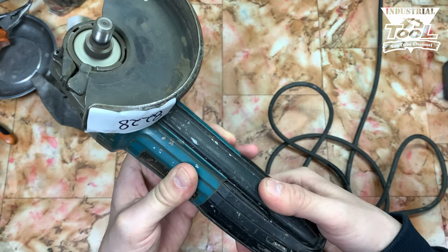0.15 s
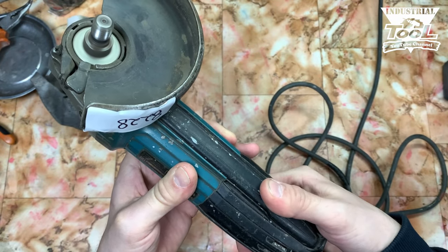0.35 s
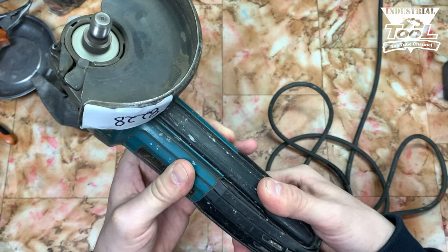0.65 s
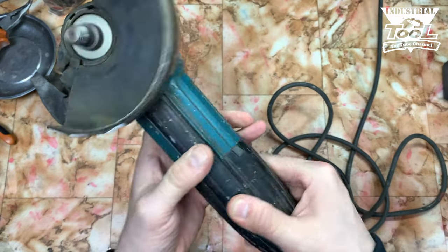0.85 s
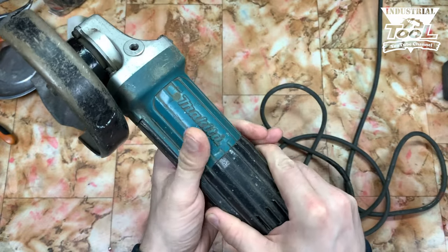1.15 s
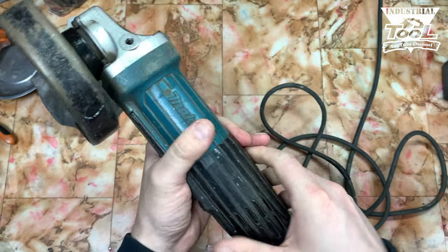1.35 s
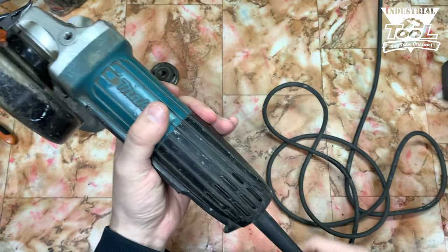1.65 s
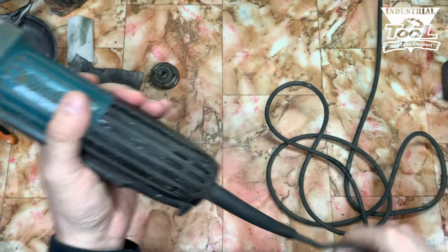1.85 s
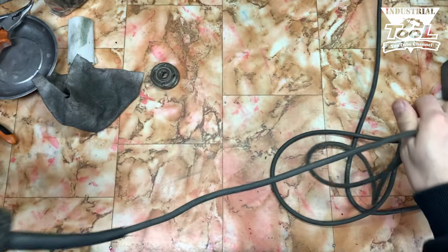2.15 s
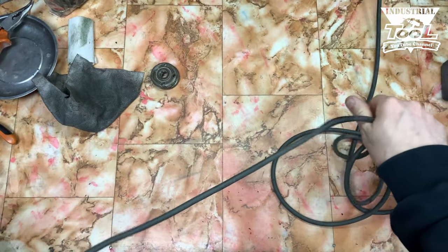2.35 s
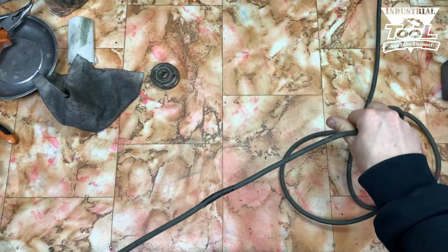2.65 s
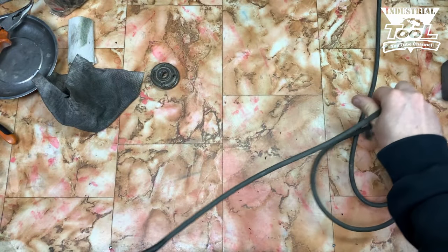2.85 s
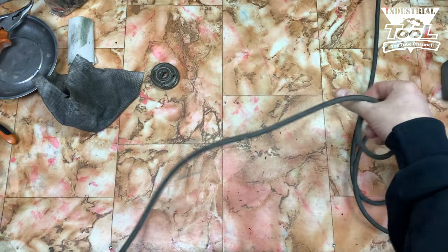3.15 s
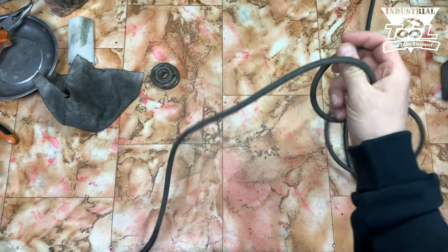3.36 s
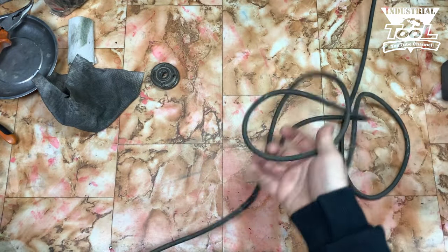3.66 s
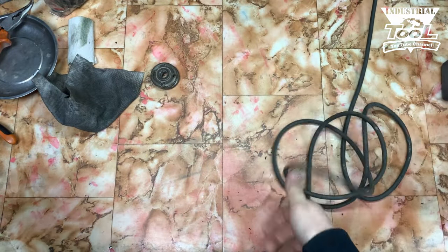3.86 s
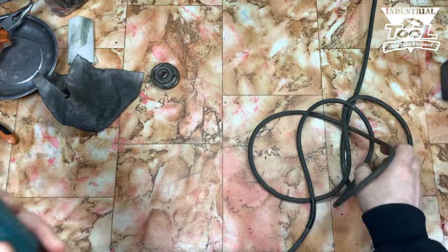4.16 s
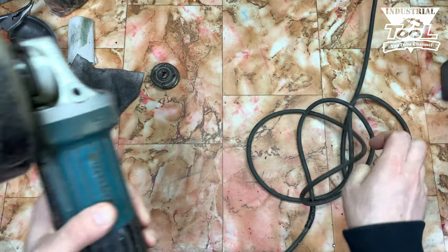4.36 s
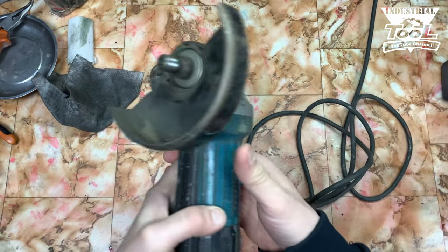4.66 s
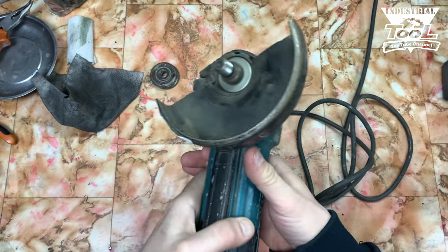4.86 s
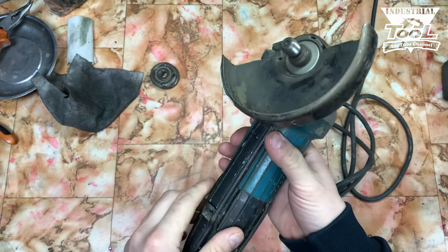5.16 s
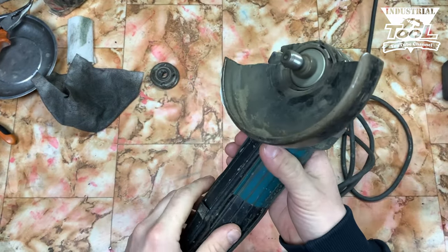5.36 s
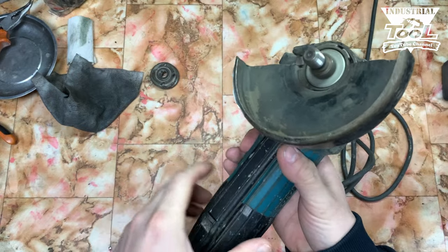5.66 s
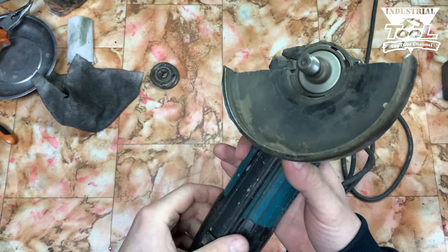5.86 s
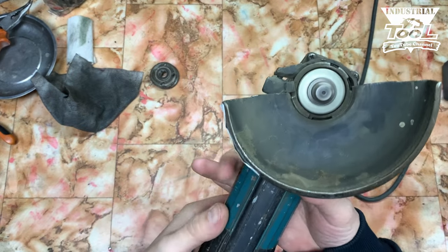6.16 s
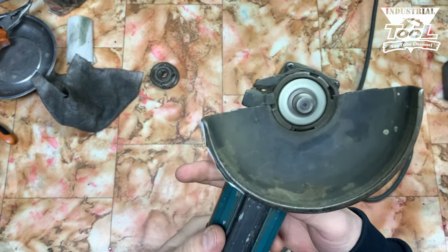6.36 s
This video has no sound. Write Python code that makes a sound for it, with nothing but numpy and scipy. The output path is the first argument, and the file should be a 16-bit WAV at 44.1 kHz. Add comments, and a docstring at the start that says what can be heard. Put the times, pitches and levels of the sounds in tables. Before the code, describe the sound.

A discless angle grinder whirs with bright, airy hiss close by, dips as it swings aside, then is switched off and spins down with gears rattling.

```python
"""A room with a tiled floor: an angle grinder without a disc runs free in the hand, close to a two-port microphone.
Shaped noise makes fan air and brush hiss over a faint shaft tone; short rings make the gear knocks.
The tool is swung aside and back while its cord lands on the tiles in dull thumps, then switched off.
As it coasts a thin whine falls with the speed, and the unloaded bevel gears start to rattle.
Behind it lie a diffuse wash from walls and floor, a low drone and the room tone."""
import sys
import numpy as np
from scipy import signal
from scipy.fft import rfft, irfft, next_fast_len
from scipy.io import wavfile
from scipy.ndimage import uniform_filter1d, map_coordinates

SR = 44100
rng = np.random.default_rng(int(sys.argv[2]) if len(sys.argv) > 2 else 0)


def transcribe(u):
    """Save the signal u as a 16-bit wav file named by the first command-line argument.

    u: samples, shape (n,) or (channels, n), limited to [-1, 1]; the rate is SR.
    q: integer samples, one column per channel.
    """
    v = np.clip(np.atleast_2d(u).T, -1, 1)
    q = np.round(v * 32767).astype(np.int16)
    wavfile.write(sys.argv[1], SR, q)


N = 287091
T = np.arange(N) / SR

# the rush as the tool is moved about and slows: t/s, fan air level/dB, brush hiss level/dB, before the trims
RUSH = [(0.02, -37.5, -36), (0.72, -38, -34), (0.94, -36.5, -33.5), (1.96, -38.5, -35), (2.1, -40.5, -36),
        (2.42, -43.5, -40.5), (2.88, -49, -45), (3.46, -43, -40.5), (3.85, -38.5, -32.5), (4.1, -39, -31),
        (4.36, -37, -32.5), (4.72, -41.5, -40.5), (5.04, -43, -43.5), (5.22, -45.5, -44), (6.03, -47, -47),
        (6.08, -48.5, -44.5), (6.21, -48, -49.5), (6.48, -50.5, -48)]
AIR_TRIM_DB, HISS_TRIM_DB = 2.5, 3.0
# which way the tool faces the microphone: t/s, pose
# (pose 0 held close, 1 swung aside, 2 brought back, 3 coasting, 4 crawling)
POSE = [(0, 0), (1.95, 0), (2.45, 1), (3.4, 1), (3.9, 2), (4.3, 2), (4.6, 2.5), (5.3, 3), (5.55, 3),
        (6.15, 4)]
# colour of the rush in each pose: f/Hz, relative level/dB
CLOSE = [(100, -28.5), (190, -25.5), (260, -14), (340, -19.5), (460, -12), (700, -15), (1100, -4.5),
         (2500, -2.5), (3700, -3.5), (4800, 3), (6000, 0.5), (7000, -3), (8100, -0.5), (9800, -5.5),
         (13000, -8), (15300, -13.5)]
ASIDE = [(100, -29), (190, -32), (260, -14.5), (480, -12.5), (720, -9.5), (1000, -2.5), (1300, -7.5),
         (2700, 1.5), (3400, -0.5), (5000, 2), (6000, 1), (7100, -5.5), (8800, 1.5), (11000, -7.5),
         (13500, -11), (15300, -12)]
BACK = [(100, -28), (190, -24), (270, -17), (450, -12.5), (700, -14.5), (1300, -5), (2100, -3.5), (2900, 1),
        (3600, -1), (5000, 1.5), (5900, 7.5), (7000, -4.5), (8400, 1), (10800, -3.5), (13200, -5.5),
        (15300, -6.5)]
COASTING = [(100, -31), (190, -20.5), (270, -14), (750, -8), (930, -2), (1040, -7), (1170, -0.5),
            (1800, -1.5), (3000, -2.5), (3700, 0), (5100, -1.5), (6500, 1), (8300, 3), (10800, -2.5),
            (13000, -7.5)]
CRAWLING = [(100, -30), (190, -16.5), (400, -8), (620, -7), (780, -1.5), (1030, -15.5), (1250, -8),
            (1750, -1.5), (2800, -2), (3700, -1.5), (5100, -5), (6500, -2), (8300, -3), (10500, -3),
            (12500, -8.5)]
# likeness of the two ports, facing the tool: f/Hz, likeness (1 = identical)
ALIKE = [(100, .98), (500, .87), (1200, .88), (2200, .68), (3700, .62), (4500, .85), (4850, .995),
         (5500, .995), (6500, .8), (8300, .99), (10300, .78), (11500, .99), (13200, .99), (14300, .75),
         (15300, .95)]
# the same with the tool swung aside, heard mostly by reflection: f/Hz, likeness (1 = identical)
ASIDE_ALIKE = [(100, .98), (500, .85), (1000, .6), (2200, .35), (4600, .35), (5600, .7), (7000, .75),
               (8300, .98), (10300, .75), (12300, .98), (15000, .8)]
# gain on the finest brush fizz with and without current, and the time its fade takes
FIZZ_ON_DB, FIZZ_OFF_DB, FIZZ_FADE_S = 2.5, -3, 1
# the rush comes back off the tiles: delay, its drift as the tool moves, share
FLOOR_S, FLOOR_DRIFT_S, FLOOR_SHARE = 0.0064, 0.00022, 0.2
YIELD_DB = -3.5  # the rush gives way to fully slack gears


def rush(speed):
    """Fan air below, brush hiss above; their colour follows the pose and the brushes sputter."""
    air_db, hiss_db = curves(RUSH)
    pose, = curves(POSE)
    pair = noise(patchy_db=2.5)
    pair = pair + FLOOR_SHARE * delayed(pair, FLOOR_S + FLOOR_DRIFT_S * wobble(1.5))
    direct, reflected = blended(pair, ALIKE), blended(pair, ASIDE_ALIKE)
    below = lambda hz, edge_hz: 1 / (1 + (hz / edge_hz) ** 10)
    poses = [(CLOSE, direct), (ASIDE, reflected), (BACK, direct), (COASTING, direct), (CRAWLING, direct)]
    air, hiss = np.zeros((2, 2, N))
    for k, (colour, source) in enumerate(poses):
        share = np.clip(1 - abs(pose - k), 0, 1)
        housing = ripple(depth_db=0.8, spacing_hz=45)
        coloured = filtered(source, lambda hz: amp(along(colour, hz)) * housing(hz))
        low = filtered(coloured, lambda hz: below(hz, 5100))
        air += share * unit(low)
        hiss += share * unit(coloured - low)
    # the top of the hiss loses strength with the current
    fizz_db = np.interp(T, [OFF_S, OFF_S + FIZZ_FADE_S], [FIZZ_ON_DB, FIZZ_OFF_DB])
    fizz = filtered(hiss, lambda hz: 1 - below(hz, 11300))
    hiss = hiss + (amp(fizz_db + 1.5 * wobble(70)) - 1) * fizz
    sputter = amp(0.5 * wobble(45) + 0.9 * wobble(400))
    fan_air = amp(air_db + AIR_TRIM_DB) * air
    brush_hiss = amp(hiss_db + HISS_TRIM_DB) * hiss * sputter
    return amp(YIELD_DB * slack(speed)) * (fan_air + brush_hiss)


# full running speed (turns per second) and the moment of switching off
FULL_SPEED, OFF_S = 590, 4.415
# bearing friction (turns per second lost each second), speed at which fan drag equals it (turns per second)
FRICTION, DRAG_SPEED = 108, 450
# an early sag: lowest moment, depth (turns per second), time constant either side
SAG_S, SAG_DEPTH, RECOVER_S = 0.09, 65, 0.44


def rotor_speed():
    """Turns per second: a sag and recovery, then a coast against friction and drag with speed squared."""
    running = FULL_SPEED - SAG_DEPTH * np.exp(-abs(T - SAG_S) / RECOVER_S)
    coasted_s = np.maximum(T - OFF_S, 0)
    return DRAG_SPEED * np.tan(np.arctan(running / DRAG_SPEED) - FRICTION / DRAG_SPEED * coasted_s)


# housing resonances that the whine sweeps through: f/Hz, width/Hz, lift/dB
WHINE_PEAKS = [(14830, 480, 8.5), (12000, 900, 0), (7860, 550, 8.5)]
# level at full speed and loss as the speed halves, both before the resonances and echoes
WHINE_DB, WHINE_DB_PER_OCTAVE = -42.5, 11
ECHO_S, ECHO_SHARE = 0.002646, 0.55  # back off the hands and guard
SCATTER_DB, SCATTER_T60_S = -7, 0.07  # back off nearby things, relative to the direct whine


def whine(speed, turns):
    """The commutator whines far above the hum; as it glides it beats against its own echoes and breaks up."""
    bars = 31
    whine_db = WHINE_DB + WHINE_DB_PER_OCTAVE * np.log2(speed / FULL_SPEED)
    whine_db = whine_db + flare(bars * speed, WHINE_PEAKS)
    phase = 2 * np.pi * bars * turns + 0.4 * wobble(60) + 0.22 * wobble(400)
    direct = np.sqrt(2) * amp(whine_db + 2.3 * wobble(40)) * np.sin(phase)
    t = np.arange(SR // 16) / SR
    tail = rng.standard_normal((2, len(t))) * amp(-60 * t / SCATTER_T60_S)
    scattered = signal.fftconvolve(direct[None], tail / np.linalg.norm(tail[0]), axes=1)[:, :N]
    return direct + ECHO_SHARE * delayed([direct], ECHO_S) + amp(SCATTER_DB) * scattered


# separate gear tooth knocks: t/s, peak level/dB before the trim
KNOCKS = [(.8902, -25), (.8942, -25), (.9004, -22), (.9262, -21), (.9328, -23), (5.5554, -29),
          (5.6141, -28), (5.6346, -29), (5.659, -28), (5.8182, -30), (5.8224, -28), (5.882, -28),
          (5.9044, -34), (5.9334, -30), (5.9853, -28), (6.0284, -29), (6.0514, -27), (6.0584, -29),
          (6.067, -33), (6.0824, -36), (6.0964, -30), (6.1184, -30), (6.1434, -31), (6.1804, -28),
          (6.185, -29), (6.2095, -25.5), (6.2135, -30), (6.241, -31), (6.2478, -27), (6.2508, -24),
          (6.255, -30), (6.2625, -31), (6.2748, -30), (6.279, -31), (6.2818, -30), (6.291, -31),
          (6.3078, -22.5), (6.3122, -30), (6.3302, -25), (6.34, -31), (6.3655, -24), (6.3704, -29),
          (6.3905, -33), (6.3965, -30), (6.4, -26), (6.4245, -30), (6.4275, -31), (6.443, -25.5),
          (6.4515, -23.5), (6.4622, -26.5), (6.472, -32), (6.4817, -27), (6.4955, -31)]
KNOCK_TRIM_DB = -1.5
# spells of harder chatter: t/s of the middle, length/s, level/dB
RATTLES = [(0.898, 0.28, -40), (6.084, 0.17, -47)]
# light chatter relative to the untrimmed hiss; chatter added once the gears are fully slack
LIGHT_CHATTER_DB, SLACK_CHATTER_DB = -18.5, -47


def gears(speed, turns):
    """Teeth bounce in their backlash: uneven chatter about once a turn, and hard, separate knocks."""
    _, hiss_db = curves(RUSH)
    strength = amp(hiss_db + LIGHT_CHATTER_DB) + amp(SLACK_CHATTER_DB) * slack(speed)
    strength = strength + sum(amp(db) * swell(T, s, length) for s, length, db in RATTLES)
    at = np.flatnonzero(np.diff(np.floor(turns)))
    late, size = rng.standard_normal((2, len(at)))
    at = np.clip(at + (late * 0.0007 * SR).astype(int), 0, N - 1)
    # each group of teeth rings in its own way
    groups = np.arange(len(at)) % 6
    chatter = np.zeros(N)
    for k in np.unique(groups):
        hits = np.bincount(at, amp(5.5 * size) * (groups == k), N)
        chatter += signal.fftconvolve(hits, tooth())[:N]
    knocks = np.zeros(N + SR)
    for s, db in KNOCKS:
        knock = tooth()
        knocks[round(s * SR):][:len(knock)] += amp(db + KNOCK_TRIM_DB) * knock
    return strength * unit(chatter) + knocks[:N]


# modes of the gear head and guard: f/Hz before detuning, relative level/dB before scatter, t60/s
HEAD = [(1200, -22, 0.045), (1700, -5, 0.009), (2240, -7, 0.007), (3730, -5.5, 0.017), (6300, -7, 0.0039),
        (7970, 2.5, 0.0054), (8340, 1.5, 0.0051), (9010, -4, 0.015), (10740, 4, 0.015)]
TOOTH_SCATTER_DB, TOOTH_DETUNE = 3, 0.012  # spread of mode levels, and of mode pitches as a share


def tooth():
    """One knock of the gears, never twice alike: a short crack and the ring of the head, with peak 1."""
    t = np.arange(SR // 25) / SR
    hz, db, t60 = np.transpose(HEAD)[:, :, None]
    size, phase, detune = rng.standard_normal((3, len(HEAD), 1))
    hz = hz * (1 + TOOTH_DETUNE * detune)
    decay = amp(db + TOOTH_SCATTER_DB * size - 60 * t / t60)
    ring = (decay * np.sin(2 * np.pi * (hz * t + phase))).sum(0)
    crack = 1.2 * amp(-60 * t / 0.0033) * rng.standard_normal(len(t))
    knock = (ring + crack) * (1 - np.exp(-t / 0.00038))
    # the small metal head radiates neither bass nor the very top
    head_band = signal.butter(4, [800, 11500], "bandpass", fs=SR, output="sos")
    knock = signal.sosfilt(head_band, knock)
    return knock / abs(knock).max()


SLACK_FROM, SLACK_FULL = 490, 253  # speeds between which the gears go slack (turns per second)


def slack(speed):
    """How loosely the gears mesh, from 0 at speed to 1 at a crawl."""
    return np.clip((SLACK_FROM - speed) / (SLACK_FROM - SLACK_FULL), 0, 1)


# once-a-turn hum, changing with grip and speed: t/s, level/dB before its wobble
HUM = [(0, -58), (.28, -57), (.4, -70), (.75, -75), (1.05, -64), (1.4, -62), (1.8, -68), (2.05, -63),
       (2.5, -73), (3.35, -75), (3.52, -62), (3.78, -67), (3.92, -58.5), (4.44, -58), (4.57, -67),
       (4.66, -58.5), (4.85, -63), (5.08, -59), (5.4, -68.5), (5.8, -73.5), (6.1, -65), (6.5, -74)]
# rotor overtones from fan and bearings: multiple of the speed, level/dB relative to the untrimmed fan air
OVERTONES = [(4, -22), (5, -19), (6, -20)]
# resonances of the gear head that they sweep through: f/Hz, width/Hz, lift/dB
OVERTONE_PEAKS = [(2950, 200, 3), (2450, 120, 10), (2200, 160, 8), (1830, 130, 11)]


def rotor(speed, turns):
    """Unbalance hums unsteadily once a turn; rough overtones sing out as they pass resonances of the head."""
    hum_db, = curves(HUM)
    air_db, _ = curves(RUSH)
    hum_phase = 2 * np.pi * turns + 0.35 * wobble(25) + 0.2 * wobble(120)
    out = np.sqrt(2) * amp(hum_db + 2.3 * wobble(14)) * np.sin(hum_phase)
    for k, db in OVERTONES:
        tone = unit(amp(2 * wobble(30)) * np.sin(2 * np.pi * k * turns + 0.6 * wobble(45)))
        out = out + amp(air_db + db + flare(k * speed, OVERTONE_PEAKS)) * tone
    return out


# narrow resonances of air path and gear head, heard as the tool turns:
# start t/s, end t/s, f/Hz, width/Hz before narrowing, level/dB
VENTS = [(1.55, 1.95, 1120, 240, -55), (1.15, 1.85, 2530, 220, -46.5), (3.53, 4.1, 2850, 400, -45),
         (5.25, 5.7, 1160, 120, -57), (6.0, 6.5, 3720, 110, -56), (6.05, 6.5, 1720, 220, -56),
         (2.21, 2.4, 910, 50, -56), (2.43, 3.35, 1010, 45, -59), (2.5, 3.3, 930, 40, -63),
         (3.35, 3.68, 930, 55, -55), (2.1, 2.5, 2060, 70, -54), (3.0, 3.45, 3545, 50, -54),
         (3, 3.24, 1590, 40, -58), (2.9, 3.6, 2630, 110, -53)]
VENT_DRIFT_S = 0.001407  # the path from the vents lengthens and shortens, bending their pitch


def vents():
    """Resonances of the air path and head swell, bend and fade as the tool turns."""
    source, out = blended(noise(patchy_db=0.5), ALIKE), np.zeros((2, N))
    for start, end, hz, width_hz, db in VENTS:
        facing = np.clip(np.minimum(T - start, end - T) / 0.11 + 0.5, 0, 1)
        out += amp(db) * facing * band(source, hz, 0.8 * width_hz)
    return delayed(out, VENT_DRIFT_S * wobble(4))


# the cord meets the floor, a hand meets the housing: t/s, f/Hz, level/dB before the attack softens it
THUMPS = [(3.352, 130, -51), (3.452, 110, -50), (3.66, 85, -54), (3.7, 120, -49), (3.78, 94.5, -53),
          (3.94, 120, -54), (3.766, 345, -38.5), (4.945, 245, -41.5), (4.959, 185, -45)]
THUMP_ATTACK_S, THUMP_T60_S = 0.0024, 0.037
# soft rubs of the hands: t/s of the middle, length/s, f/Hz, level/dB
RUBS = [(4.925, 0.037, 115, -65.5), (4.972, .07, 238, -57), (4.997, 0.05, 160, -62)]
RUB_WIDTH = 0.25  # bandwidth of a rub, as a share of its pitch


def handling():
    """The cord drops on the tiles in short, dull thumps; the grip shifts with a bump and brief rubs."""
    source, out = rng.standard_normal(N), np.zeros(N)
    for s, length, hz, db in RUBS:
        out += amp(db) * swell(T, s, length) * band(source, hz, RUB_WIDTH * hz)
    t = np.arange(SR // 8) / SR
    for s, hz, db in THUMPS:
        envelope = amp(db - 60 * t / THUMP_T60_S) * (1 - np.exp(-t / THUMP_ATTACK_S))
        out[round(s * SR):][:len(t)] += envelope * np.sin(2 * np.pi * hz * t)
    return out


# phase by which the left port leads: f/Hz, lead/rad
LEAD = [(30, 0), (450, -.15), (700, -.8), (1030, .8), (1400, .15), (1950, .25), (2500, 1.8), (3900, 1.4),
        (4550, 2.2), (4850, 3.02), (5500, 3.27), (5900, 3.95), (7800, 6.2), (9400, 6.45), (11200, 9.25),
        (13500, 9.6), (14600, 12), (15800, 12.5)]
# level of the left port over the right: f/Hz, level/dB
TILT = [(60, -2), (110, 1.5), (200, -3.5), (380, -0.5), (700, -6), (1290, -0.5), (2380, -4), (4400, 0.5),
        (5200, 1), (8120, 0), (15000, -1)]
# further lead of the left port with the tool swung aside: f/Hz, lead/rad
ASIDE_LEAD = [(300, 0), (700, .8), (4000, .9), (5000, .8), (6500, 0)]


def ports(tool):
    """Phase and level between the microphone's two ports depend on frequency, and shift with the swing aside."""
    sides = np.array([[0.5], [-0.5]])
    ahead = filtered(tool, lambda hz: amp(sides * along(TILT, hz)) * np.exp(1j * sides * along(LEAD, hz)))
    aside = filtered(ahead, lambda hz: np.exp(1j * sides * along(ASIDE_LEAD, hz)))
    pose, = curves(POSE)
    swung = np.clip(1 - abs(pose - 1), 0, 1)
    return (1 - swung) * ahead + swung * aside


# the hiss thrown back by walls and floor: f/Hz, relative level/dB
DIFFUSE = [(100, -47), (300, -22), (700, 4), (1500, 7), (2800, 8), (4200, 7), (5200, -14), (6200, -8),
           (7300, -4), (10000, -25), (15000, -43)]


def walls(speed):
    """The room's share of the rush: unrelated at the two ports, set by speed however the tool is held."""
    wash = unit(filtered(rng.standard_normal((2, N)), lambda hz: amp(along(DIFFUSE, hz))))
    return amp(-49.0) * (speed / speed.max()) ** 5 * wash


DRONE_DB, DRONE_FADE_DB_PER_S = -78.5, 19  # level beside the running tool, and fade after switching off


def drone():
    """A faint, wavering low drone with a weaker hum above it; both fade once the current is off."""
    drone_db = DRONE_DB - DRONE_FADE_DB_PER_S * np.maximum(T - OFF_S, 0)
    tone = unit(amp(2 * wobble(5.53)) * np.sin(2 * np.pi * 61.0 * T + 0.9 * wobble(12)))
    hum = band(rng.standard_normal(N), 99.4, 13)
    return amp(drone_db) * (tone + amp(-3.5) * hum)


# colour of the room tone: f/Hz, relative level/dB
ROOM_TONE = [(20, -22), (45, -9), (60, -2), (80, -4), (100, -8), (190, -13), (400, -6), (2000, -41)]


def room_tone():
    """A steady, very faint low noise, the same at both ports."""
    return amp(-77.0) * unit(filtered(rng.standard_normal(N), lambda hz: amp(along(ROOM_TONE, hz))))


def amp(db):
    """Decibels to a linear factor."""
    return 10 ** (np.asarray(db) / 20)


def unit(x):
    """x scaled to rms 1."""
    return x / np.sqrt(np.mean(x ** 2) + 1e-20)


def along(points, hz):
    """A curve through (f/Hz, value) points on a log axis."""
    f, v = np.transpose(points)
    return np.interp(np.log(hz + 1), np.log(f + 1), v)


def curves(rows):
    """One value per sample for each column after the time."""
    s, *cols = np.transpose(rows)
    return [np.interp(T, s, c) for c in cols]


def wobble(rate):
    """A smooth random curve, rate knots a second."""
    return map_coordinates(rng.standard_normal(int(N * rate / SR) + 4), [T * rate])


def swell(x, centre, width):
    """A bell-shaped rise and fall with peak 1."""
    return np.exp(-(2 * (x - centre) / width) ** 2)


def flare(hz, peaks):
    """The lift in dB of a tone that sweeps through resonances."""
    return sum(db * swell(hz, centre_hz, width_hz) for centre_hz, width_hz, db in peaks)


def filtered(x, response):
    """x times a complex response of frequency."""
    m = next_fast_len(N + 8192)
    return irfft(rfft(x, m) * response(np.fft.rfftfreq(m, 1 / SR)), m)[..., :N]


def band(x, centre_hz, width_hz):
    """x twice through one resonance, at rms 1."""
    resonance = lambda f: 1j * f * width_hz / (centre_hz ** 2 - f * f + 1j * f * width_hz)
    return unit(filtered(x, lambda f: resonance(f) ** 2))


def ripple(depth_db, spacing_hz):
    """The close, uneven resonances of the housing, as a gain over frequency."""
    knots = rng.standard_normal(2048)
    return lambda hz: amp(depth_db * map_coordinates(knots, [hz / spacing_hz], mode="mirror"))


def noise(patchy_db):
    """Two unrelated noises with drifting ripples from reflections around a moving tool; the bass is evener."""
    hz, _, z = signal.stft(rng.standard_normal((2, N)), SR, nperseg=2048)
    field = uniform_filter1d(rng.standard_normal(z.shape[1:]), size=4, axis=0)  # over frequency
    field = uniform_filter1d(field, size=7, axis=1)  # over time
    depth_db = patchy_db * along([(400, .3), (1500, 1)], hz)[:, None]
    return signal.istft(z * amp(depth_db * unit(field)), nperseg=2048)[1][:, :N]


def blended(pair, alike):
    """Two unrelated noises mixed to a given likeness of left and right."""
    turn = lambda hz: np.arccos(np.clip(along(alike, hz), -1, 1)) / 2
    mid, side = filtered(pair, lambda hz: np.array([np.cos(turn(hz)), np.sin(turn(hz))]))
    return np.array([mid + side, mid - side])


def delayed(x, delay_s):
    """Every channel arriving late by a time that may change."""
    return np.array([map_coordinates(c, [(T - delay_s) * SR]) for c in x])


def scene():
    """The tool and its handling reach the two ports over the wash of the walls, the room tone and the drone."""
    speed = rotor_speed()
    turns = np.cumsum(speed) / SR
    tool = rush(speed) + whine(speed, turns) + gears(speed, turns)
    tool = tool + rotor(speed, turns) + vents() + handling()
    return ports(tool) + walls(speed) + drone() + room_tone()


TOP_HZ = 15750


def record(dry):
    """The microphone sheds deep bass and keeps nothing above its band limit."""
    thin = filtered(dry, lambda hz: 1 - 1 / (1 + (hz / 42) ** 3))
    return filtered(thin, lambda hz: hz < TOP_HZ)


dry = scene()
out = record(dry)
transcribe(out)
```